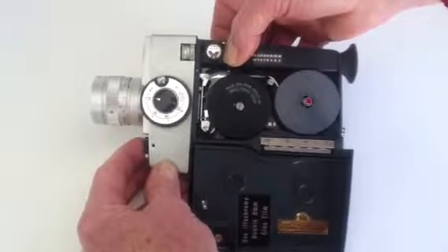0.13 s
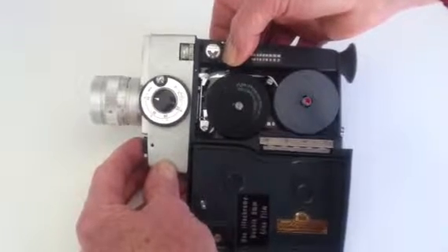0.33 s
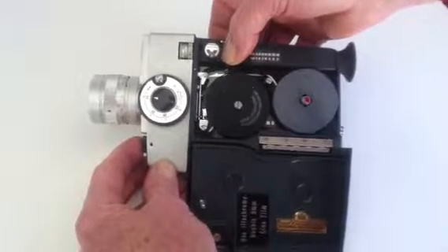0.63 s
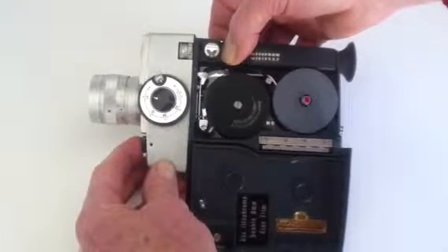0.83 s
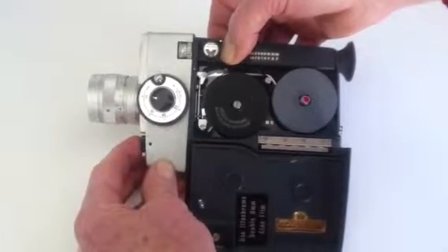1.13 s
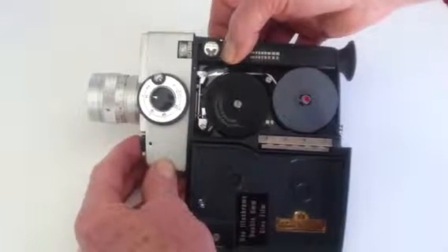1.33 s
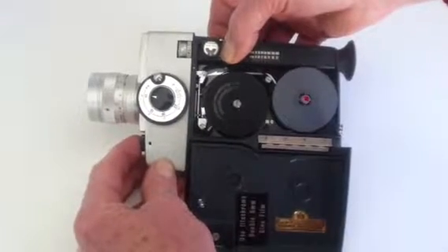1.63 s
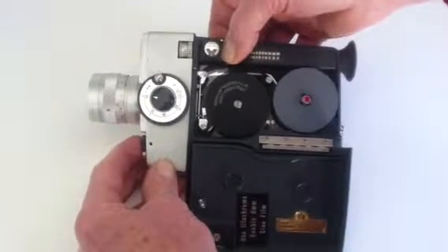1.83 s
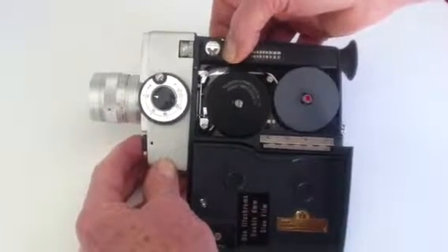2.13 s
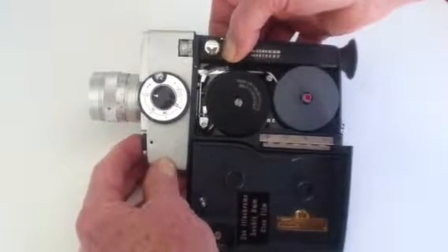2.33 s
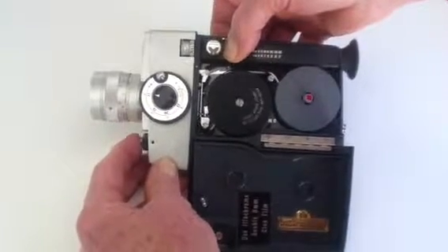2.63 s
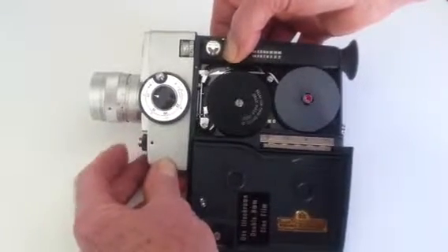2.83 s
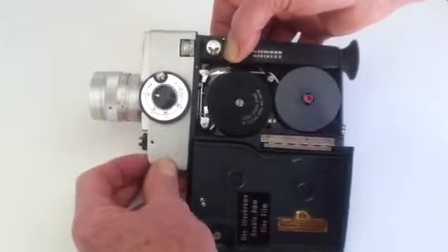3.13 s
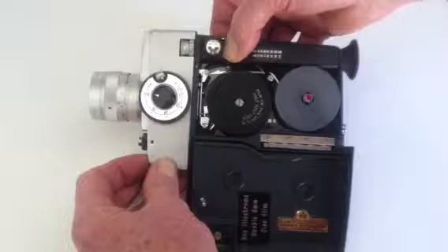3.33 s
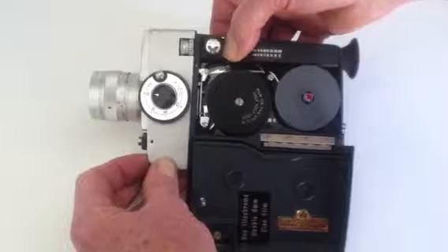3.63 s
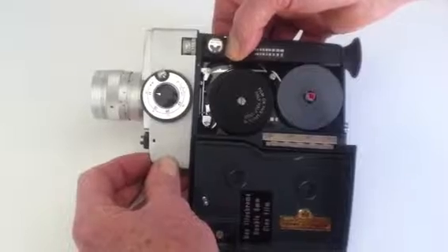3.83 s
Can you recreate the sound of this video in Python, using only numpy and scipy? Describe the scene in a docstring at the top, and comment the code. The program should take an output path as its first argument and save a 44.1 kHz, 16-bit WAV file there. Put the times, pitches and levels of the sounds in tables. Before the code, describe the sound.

A small clockwork film camera runs with a fast, steady clatter, then stops abruptly.

```python
"""Clockwork film camera, door open

It runs on a table at about 16 frames a second until the catch stops it. Each frame the claw strikes,
drags the film through the gate (which squeaks now and then) and springs back over whirring gears,
all ringing one metal body. Fingers shift and let go. A small room, an appliance humming far off."""
import sys
import numpy as np
from scipy import signal
from scipy.fft import rfft, irfft
from scipy.io import wavfile
from scipy.ndimage import uniform_filter1d

SR = 44100
rng = np.random.default_rng(int(sys.argv[2]) if len(sys.argv) > 2 else 0)


def transcribe(u):
    """Save the signal u as a 16-bit wav file named by the first command-line argument.

    u: samples, shape (n,) or (channels, n), limited to [-1, 1]; the rate is SR.
    q: integer samples, one column per channel.
    """
    v = np.clip(np.atleast_2d(u).T, -1, 1)
    q = np.round(v * 32767).astype(np.int16)
    wavfile.write(sys.argv[1], SR, q)


N = 176400
PAD = 4410  # pre-roll in samples
M = N + PAD
TIME = (np.arange(M) - PAD) / SR
HZ = np.arange(M // 2 + 1) * SR / M + 1e-3

# The film's beat. Each row: start in seconds, then strike, drag, door ring and low squeak levels in dB.
FRAMES = [(0.0329, -40, -39.5, -45, -56), (0.0925, -36, -40, -37, -57), (0.1505, -40, -40, -51, -55),
          (0.215, -40, -36.5, -33.5, -56), (0.278, -41.5, -39.5, -41, -59),
          (0.337, -37, -39.5, -41.5, -41.5), (0.4, -37, -36.5, -38, -40), (0.459, -40, -38.5, -41, -39),
          (0.52, -39, -42.5, -41.5, -37.5), (0.583, -34, -37.5, -36.5, -38),
          (0.641, -38, -39.5, -40, -37.5), (0.702, -35, -38, -42.5, -40), (0.763, -33, -37.5, -38, -36),
          (0.825, -38, -37.5, -46, -52), (0.886, -38, -37.5, -43, -64.5), (0.946, -39, -37, -42, -58),
          (1.008, -39, -39, -40, -63), (1.07, -37.5, -38.5, -40, -57), (1.1297, -39, -39, -38, -63),
          (1.19, -34, -40, -40, -61), (1.2532, -37, -40.5, -49, -55), (1.315, -43, -38, -37.5, -61),
          (1.3805, -37.5, -39, -39, -60), (1.437, -36, -38, -59, -55), (1.499, -39, -36, -50, -55),
          (1.559, -36.5, -39.5, -41, -58), (1.6195, -42, -39.5, -34.5, -53),
          (1.6836, -37, -40.5, -38.5, -59), (1.745, -37, -38.5, -41, -43), (1.805, -37, -39, -41, -41.5),
          (1.867, -37.5, -38, -35.5, -43), (1.9298, -38, -38, -42, -49), (1.9897, -39, -40, -38, -54),
          (2.05, -36.5, -40.5, -38, -40.5), (2.1128, -37.5, -39, -37.5, -57),
          (2.172, -34.5, -37, -36.5, -53), (2.232, -39, -39, -38, -58), (2.296, -36.5, -39, -35, -51),
          (2.358, -33.5, -39, -40.5, -44), (2.419, -36, -38.5, -43, -38), (2.4808, -36, -37.5, -38, -37.5),
          (2.545, -39, -38.5, -51, -37), (2.6033, -34.5, -37.5, -54, -41), (2.663, -37.5, -39.5, -48, -40),
          (2.726, -32.5, -40, -34.5, -40)]
# Hard claw landings and high gate squeaks. Each row: start in seconds, level in dB.
SNAPS = [(0.4015, -28), (0.581, -28.5), (1.687, -25), (1.7449, -26), (2.176, -30.5), (2.4825, -32),
         (2.5456, -28.5), (2.6047, -28.5), (2.7275, -32)]
HIGH_SQUEAKS = [(.581, -37), (.644, -54), (1.806, -47), (1.867, -41), (1.931, -47), (2.42, -42),
                (2.544, -39), (2.605, -38)]
# Metal resonances. Each row: pitch in Hz, width in Hz, relative level in dB.
BODY_MODES = [(773, 61, -2), (1585, 98, -1.5), (1698.4, 33, 0), (2002, 56, 0), (2456, 117, -9.5),
              (2794, 24, 3), (3227, 115, -8), (4026, 84, -0.5), (4793, 87, -5), (5120, 220, 1.5),
              (5617, 134, -2), (5856, 88, 5.5), (6555, 108, -0.5), (7180, 54, 2), (9887, 104, -5.5),
              (11080, 183, -1.5)]
DOOR_MODES = [(1676, 29.7, 9), (1598, 76, -8)]
# Tone of each source. Each row: frequency in Hz, relative gain in dB.
STRIKE_EQ = [(400, -25), (2000, -7.5), (4000, -5.5), (6000, -7), (9000, -14.5), (11000, 3), (13000, -10),
             (15500, -13)]
RETURN_EQ = [(3000, -5.5), (6000, -30), (9000, -3.5), (11000, 10), (14000, -12)]
DRAG_EQ = [(500, -38), (1000, -12), (2000, 2.5), (4000, -12), (6000, 0), (8000, -7.5), (11000, -9),
           (13000, -18), (15500, -30)]
GEARS_EQ = [(60, -36), (150, -12), (300, -6.5), (540, -21), (1000, -8), (1700, 3.5), (3500, -5.5),
            (6000, -5.5), (9000, -7.5), (13000, -9), (15500, -17)]
CATCH_EQ = [(60, -20), (200, -5), (500, -11), (1000, -2.5), (2000, 5.5), (4000, -4), (7000, -4),
            (11000, -2), (15500, -11)]
AIR_EQ = [(30, -30), (60, -22), (145, -9.5), (239, -5), (345, -7), (600, -15), (1630, -16), (1960, -13),
          (2250, -18.5), (9220, -21.5), (16000, -23)]
# The catch's bites. Each row: start in seconds, level in dB, decay in seconds, tilt in dB per octave.
CATCHES = [(2.7509, -23, 0.0052, 0.5), (2.766, -24, .004, 1.5), (2.772, -30.5, 0.0076, 3.5),
           (2.797, -38, 0.023, 2), (2.821, -25.5, 0.011, -1), (2.843, -38.5, 0.0063, -4),
           (2.879, -53, 0.0051, -8)]
# Finger noises. Each row: start in seconds, level in dB, decay in seconds, centre in Hz, width in Hz.
TOUCHES = [(2.176, -48.5, 0.013, 647, 600), (3.1089, -63, 0.0018, 4000, 6000),
           (3.113, -57.5, 0.034, 190, 300), (3.171, -62, 0.031, 1480, 1800)]
# The appliance's hum. Each row: harmonic number, level in dB.
HUM_HARMONICS = [(3, -74), (4, -87.5), (6, -79.5), (7, -68), (8, -74), (40, -81), (49, -84)]
# Swells of its whine. Each row: start in seconds, level in dB.
WHINE_SWELLS = [(3.4, -81), (3.84, -77)]


def claw_strike(starts, dbs):
    """The claw hits the film: a bright, gritty tick through the body."""
    grit = rattle(5) * amp(0.96 * walk(420))
    envelope = strokes(starts, dbs, attack=0.004, hold=0.0015, decay=0.0084)
    return ring(grit * envelope, body(STRIKE_EQ), band=(4500, 22000))


def claw_snaps():
    """Now and then the claw lands with a sharp snap."""
    envelope = strokes(*np.transpose(SNAPS), attack=0.0002, hold=0.001, decay=0.00069)
    return ring(rattle(2.4) * envelope, body(STRIKE_EQ))


def claw_return(starts):
    """The claw springs back with a thin tick, never twice at the same level."""
    dbs = rng.normal(-45, 2, len(starts))
    envelope = strokes(starts, dbs, delay=0.021, attack=0.0065, hold=0.0038, decay=0.0075)
    return ring(rattle(2.9) * envelope, body(RETURN_EQ))


def film_drag(starts, dbs):
    """Film rubs through the gate in a short rasp."""
    friction = rattle(1.4) * amp(1.64 * walk(340))
    envelope = strokes(starts, dbs, attack=0.004, hold=0.02, decay=0.0023)
    return ring(friction * envelope, body(DRAG_EQ), band=(4400, 7800))


def door_ring(starts, dbs):
    """Chatter sets the door panel ringing on each frame."""
    envelope = strokes(starts, dbs, delay=0.0035, attack=0.015, hold=0.01, decay=0.012)
    return sing(rattle(1.7), DOOR_MODES) * envelope


def gate_squeaks(starts, dbs):
    """Film squeaks in the gate at two pitches, the higher one rarer."""
    low = strokes(starts, dbs, delay=0.0057, attack=0.0028, hold=0.0089, decay=0.019)
    high = strokes(*np.transpose(HIGH_SQUEAKS), delay=0.002, attack=0.0022, hold=0.0098, decay=0.0067)
    return sing(rattle(1.7), [(8490, 66, 0)]) * low + sing(rattle(2.6), [(13000, 89, 0)]) * high


def gears(stop_s=2.848, decay_s=0.0041):
    """Gear teeth chatter into a fluttering whirr, cut short at the stop."""
    teeth = rattle(2.45) * amp(-39.5 + 0.82 * walk(6.4) + 1.33 * walk(140))
    running = np.exp(-np.maximum(TIME - stop_s, 0) / decay_s)
    return ring(teeth * running, body(GEARS_EQ))


def catch():
    """The catch bites the gear train in a quick run of clacks."""
    octaves = np.log2(np.clip(HZ, 300, 16000) / 3000)
    out = np.zeros(M)
    for start, db, decay, tilt in CATCHES:
        blow = rattle(2) * strokes([start], [db], attack=0.0006, hold=0.002, decay=decay)
        out += ring(blow, body(CATCH_EQ) * amp(tilt * octaves))
    return out


def fingers():
    """Fingers shift on the body and let go: a knock, then a faint tick, thump and brush."""
    out = np.zeros(M)
    for start, db, decay, hz, width in TOUCHES:
        touch = rattle(1.6) * strokes([start], [db], attack=0.0008, hold=0.001, decay=decay)
        low_cut = np.minimum(HZ / hz, 1)
        out += ring(touch, modes([(hz, width, 0)]) * low_cut)
    return out


def rumble(fade_s=0.85):
    """A low rumble, strongest at first."""
    noise = rattle(0) * amp(-59) * np.exp(-TIME / fade_s)
    return ring(noise, modes([(231, 41, -6), (396, 23, -2)]))


def appliance(hum_hz=49.26):
    """A far-off motor: wavering hum and a thin whine that swells twice."""
    phase = 2 * np.pi * np.cumsum(hum_hz * (1 + 0.00056 * walk(1.7))) / SR
    hum = sum(np.sqrt(2) * amp(db + 1.3 * walk(5)) * np.sin(k * phase + rng.uniform(0, 7))
              for k, db in HUM_HARMONICS)
    whine = ring(rattle(0), modes([(4980, 55, 0)]))
    swells = strokes(*np.transpose(WHINE_SWELLS), attack=0.0066, hold=0.035, decay=0.03)
    return hum + whine * (amp(-83 + 2.7 * walk(8)) + swells)


def room(near, t60_s=0.21, build_s=0.0028, dull_hz=4720):
    """Close walls throw back a short, dull tail."""
    t = np.arange(SR // 2) / SR
    tail = rng.standard_normal(len(t)) * np.exp(-np.log(1000) * t / t60_s) * np.minimum(t / build_s, 1)
    tail = signal.sosfilt(signal.butter(1, dull_hz, fs=SR, output="sos"), tail)
    return amp(-15) * signal.fftconvolve(near, tail / np.linalg.norm(tail))[:M]


def air():
    """A steady bed of room air and preamp hiss."""
    return amp(-65.5) * ring(rng.standard_normal(M), colour(AIR_EQ))


def amp(db):
    return 10 ** (np.asarray(db, float) / 20)


def colour(eq):
    """Gain curve through the EQ points."""
    hz, db = np.transpose(eq)
    return amp(np.interp(np.log(HZ), np.log(hz), db))


def modes(table):
    """Resonances of alternating polarity. Each row: pitch in Hz, width in Hz, level in dB."""
    return sum((-1) ** k * amp(db) / (1 + 2j * (HZ - hz) / width)
               for k, (hz, width, db) in enumerate(table))


def body(eq, fill_db=-7.5):
    """The metal body under a source's EQ; a flat fill stands for its dense small modes."""
    return (amp(fill_db) + modes(BODY_MODES)) * colour(eq)


def ring(x, response, band=(20, 20000)):
    """Filter x so that unit noise comes out at 0 dB within the band, in Hz."""
    inside = (HZ > band[0]) & (HZ < band[1])
    power = np.sum(abs(response[inside]) ** 2) / len(HZ)
    return irfft(rfft(x) * response, M) / np.sqrt(power)


def sing(chatter, table):
    """A narrow ring kept going by steady chatter, its swells flattened."""
    tone = ring(chatter, modes(table))
    return tone / np.sqrt(uniform_filter1d(tone ** 2, size=300) + 0.074)


def rattle(spread_db):
    """Dense tiny contacts at rms 1; more spread, more grit."""
    x = rng.standard_normal(M) * amp(spread_db * np.minimum(rng.exponential(1, M), 5))
    return x / x.std()


def walk(rate_hz):
    """Smooth random wander, spread 1."""
    span = int(SR / rate_hz)
    x = uniform_filter1d(uniform_filter1d(rng.standard_normal(M), span), span)
    return x / x.std()


def strokes(starts, dbs, attack, hold, decay, delay=0):
    """One envelope at each start, all times in seconds."""
    t, out = np.arange(PAD) / SR, np.zeros(M + PAD)
    shape = np.minimum(t / attack, 1) * np.exp(-np.maximum(t - attack - hold, 0) / decay)
    for start, db in zip(starts, dbs):
        i = PAD + int((start + delay) * SR)
        out[i:i + PAD] += amp(db) * shape
    return out[:M]


def scene():
    """Camera and fingers up close, the room behind."""
    lead_in = np.subtract(FRAMES[0], [0.067, 0, 0, 0, 0])  # one frame early: already running
    starts, strike_db, drag_db, door_db, squeak_db = np.vstack([lead_in, FRAMES]).T
    near = gears() + claw_strike(starts, strike_db) + film_drag(starts, drag_db) + claw_return(starts)
    near += door_ring(starts, door_db) + gate_squeaks(starts, squeak_db)
    near += claw_snaps() + rumble() + catch() + fingers()
    return (near + room(near) + appliance() + air())[None, PAD:]


def record(dry):
    """A steep low-pass takes off the very top."""
    return signal.sosfilt(signal.ellip(10, 0.2, 70, 15750, fs=SR, output="sos"), dry)


dry = scene()
out = record(dry)
transcribe(out)
```